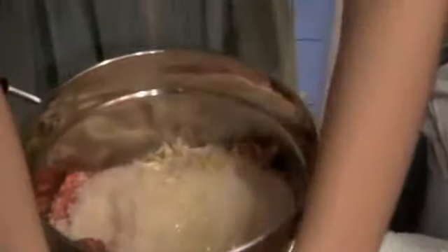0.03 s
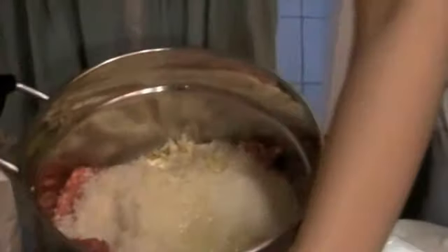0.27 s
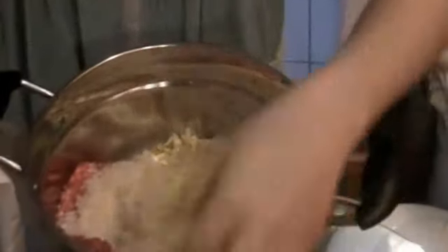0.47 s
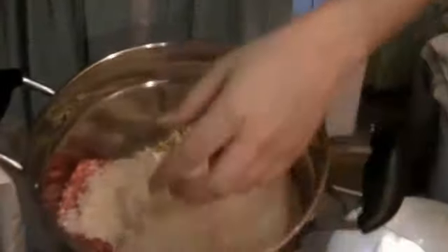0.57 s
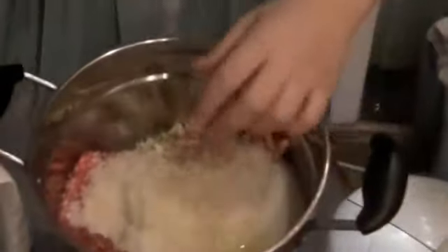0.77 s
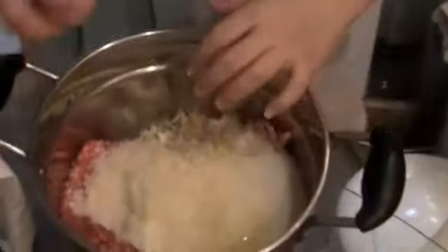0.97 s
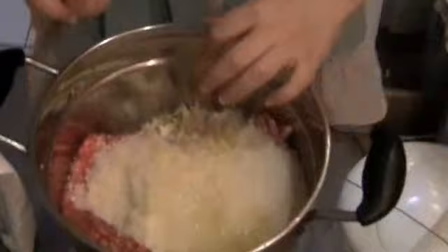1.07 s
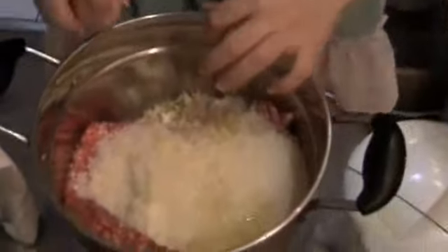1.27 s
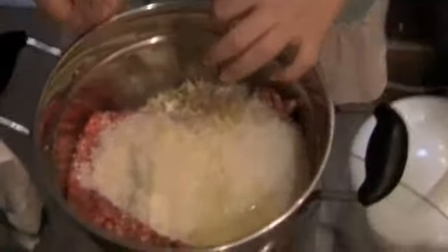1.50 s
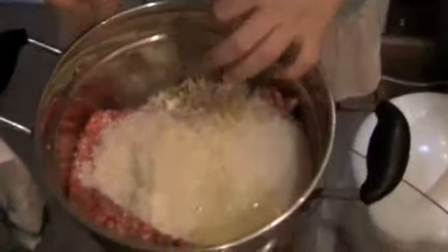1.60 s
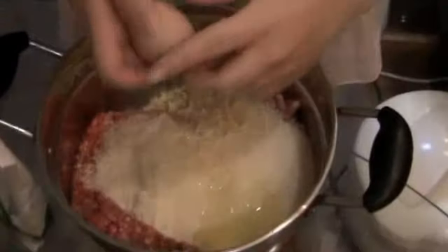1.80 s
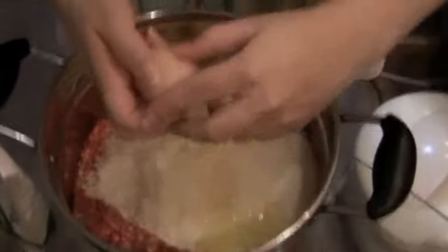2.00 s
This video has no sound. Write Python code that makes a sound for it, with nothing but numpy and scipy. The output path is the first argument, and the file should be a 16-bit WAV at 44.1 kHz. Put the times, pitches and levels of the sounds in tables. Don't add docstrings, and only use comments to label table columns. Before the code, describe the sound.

Egg cracking on a metal pot: light ticks of fingers on shell, the pot's base clatters and scrapes, small bumps follow, then two sharp knocks splinter the shell. Close-up in a live, quietly humming kitchen.

```python
import sys
import numpy as np
from scipy import signal
from scipy.io import wavfile

SR = 44100
rng = np.random.default_rng(int(sys.argv[2]) if len(sys.argv) > 2 else 0)


def master(y):
    cut = np.clip(np.atleast_2d(y).T, -1, 1)
    pcm = np.round(cut * 32767)
    wavfile.write(sys.argv[1], SR, pcm.astype(np.int16))


def invert_db(level):
    return 10 ** (np.asarray(level, dtype=float) / 20)


N = 90404

# frequency in Hz, level in dB per Hz.
AIR_SPECTRUM = [(25, -20), (60, -11.5), (115, -7.5), (200, -7), (450, -10.5), (1500, -15.5), (3000, -26.5),
                (13000, -38.5)]
# frequency in Hz, likeness from 0 to 1.
AIR_LIKENESS = [(60, 0.85), (240, 0.64), (950, 0.1), (3770, 0.22), (15000, 0.24)]
# frequency in Hz, level in dB rms.
MOTOR_HUM = [(50, -65.5), (180, -57)]
# start in seconds, peak in dB, pitch in Hz.
FINGER_TICKS = [(0.041, -53, 8000), (.070, -41, 9060), (0.087, -50, 8000), (0.1127, -29.5, 8000),
                (.129, -39, 7500), (.173, -36, 5500), (.187, -52, 7500), (0.222, -44, 9000),
                (0.292, -29, 10000), (0.354, -17.5, 4500), (.388, -25, 9000), (.576, -41, 8500),
                (.585, -29.5, 8500), (.596, -47, 10000), (.657, -36, 4900), (0.6712, -23, 2500),
                (0.6713, -35, 7500), (.684, -52, 4920), (.764, -29, 1157), (0.805, -39.5, 3500),
                (0.8057, -37.5, 8500), (0.875, -66, 1980), (1.027, -55, 1770), (1.96, -58, 2920)]
# start in seconds, end in seconds, level in dB.
SHELL_RUSTLES = [
    (0.071, 0.123, -68),
    (.11, 0.163, -59.5),
    (0.16, 0.25, -71),
    (0.577, 0.604, -64),
    (0.66, 0.691, -54.5),
]
# start in seconds, peak in dB, centre of the thud in Hz.
SOFT_BUMPS = [
    (0.172, -30, 1094),
    (0.646, -33, 390),
    (0.695, -36, 496),
    (0.805, -40.5, 1040),
    (1.198, -38.5, 800.0),
    (1.061, -55, 910),
]
# frequency in Hz, time to fall 60 dB in seconds.
KITCHEN_DECAY = [(150, 0.63), (500, 0.41), (1500, .42), (4000, 0.43), (9000, .33), (14000, 0.15)]
# frequency in Hz, side over mid in dB.
KITCHEN_WIDTH = [(200, -16), (2000, -14), (6000, -12.5), (13000, -0.5)]
# frequency in Hz, level in dB.
KITCHEN_TONE = [(100, 0.5), (400, 2.5), (1500, 2.5), (4000, 1.5), (8000, -0.5), (11500, 6), (14500, -21)]
# frequency in Hz, level in dB, time to fall 60 dB in seconds.
POT_MODES = [(262.6, -33.5, 0.8), (313, -26.5, 0.36), (388, -30, .2), (942, -21.5, 0.24), (1020, -36, 0.16),
             (1060, -30.5, 0.33), (1222, -20, 0.17), (1348, -27.5, 0.23), (1464, -23, 0.093),
             (1532, -30.5, .2), (1640, -32, 0.2), (2246, -26, 0.22), (3955, -32, 0.22), (6190, -30.5, 0.11)]
# frequency in Hz, level in dB, time to fall 60 dB in seconds.
HELD_POT_MODES = [(311.5, -1, .6), (452, -4.5, 0.41)]
# frequency in Hz, level in dB, time to fall 60 dB in seconds.
COUNTER_MODES = [(153, -29.5, 0.11), (268.3, -36.5, 0.56), (574.6, -23, 0.089), (974, -23.5, .12)]
# start in seconds, peak in dB.
BOUNCES = [(0.232, -3.5), (0.235, -1.5), (0.25, 0), (0.254, -1.5), (0.266, -5), (0.288, -13.5),
           (0.313, -25), (0.332, -19), (0.353, -9.5), (0.372, -35.5), (0.386, -22.5)]
# frequency in Hz, level in dB, time to fall 60 dB in seconds.
BASE_MODES = [(398, -13.5, 0.019), (743, -8, 0.0067), (1037, -8.5, 0.013), (1553, -1, 0.0051),
              (1890, -2, 0.006), (2500, -4.5, 0.0045), (3265, -8.5, 0.0056), (4060, -13.5, 0.0054),
              (5290, -19.5, 0.0079), (7500, -17.5, 0.0018), (10300, -26.5, .002)]
# start in seconds, blow in dB, shell crack in dB, crack delay in seconds, wall ring in dB.
EGG_KNOCKS = [
    (1.3678, 4, 7, 0.00029, -18.5),
    (1.5639, -7, 1, .0018, -29.5),
]
# frequency in Hz, level in dB, time to fall 60 dB in seconds.
RIM_MODES = [(173, -19, 0.015), (414, -28.5, 0.048), (561, -13, 0.035), (800, -14.5, 0.0079),
             (1040, -10.5, 0.032), (1340, 3.5, 0.0031), (2200, -9, 0.011), (2700, -15.5, 0.023)]
# frequency in Hz, level in dB, time to fall 60 dB in seconds.
SHELL_MODES = [(3500, -16, 0.0085), (4870, -12, 0.0011), (5400, -20.5, .025), (5985, -6.5, 0.0045),
               (7500, -11, 0.0079), (8500, -5, 0.0018), (9440, -15.5, 0.011), (11370, -12.5, 0.0018),
               (14600, -26, 0.00196)]

AIR_DB = -50
SPREAD_DB, EGG_SPREAD_DB = 3.5, 1.8
TICK_CYCLES, TICK_DB, TICK_OCTAVES = 6.8, 2, 1
RUSTLE_PER_S = 2600
KITCHEN_DB, FIRST_ECHO_S = -34.0, 0.0015
RING_SEND_DB, HAND_SEND_DB = -6, -5.0
BOUNCE_DB, BUMP_RING_DB = 5.0, 18.5
SLIDE_START_S, SLIDE_END_S, SLIDE_PER_S, SLIDE_DB = 0.235, 0.36, 900.0, -24.5
BASE_BAND_HZ = [310, 9500]
LANDING_DB, LANDING_HZ = -28.5, 87.5
BURST_SAMPLES = 2048
MAKEUP_DB, PAN_DB, HAND_PAN_DB, AIR_PAN_DB = 1.5, 0.53, -1, -0.4
LOW_CUT_HZ, TOP_CUT_HZ = 29.5, 11700
DUCK_FROM_DB, DUCK_SHARE, DUCK_ATTACK_S, RECOVER_DB_PER_S = -2.5, 0.96, 0.00042, 56.5
CEILING = 1.37


def at_hz(points, hz):
    table_hz, value = np.transpose(points)
    return np.interp(np.log(hz), np.log(table_hz), value)


def band_pass(x, band_hz, order=2):
    return signal.sosfilt(signal.butter(order, band_hz, "band", fs=SR, output="sos"), x)


def ring(clicks, hz, t60):
    radius = invert_db(-60 / (t60 * SR))
    angle = 2 * np.pi * hz / SR
    return signal.lfilter([0, np.sin(angle)], [1, -2 * radius * np.cos(angle), radius**2], clicks + 1e-18)


def strike(modes, s, db, spread_db=SPREAD_DB):
    out = np.zeros(N)
    own = rng.standard_normal((len(s), len(modes)))
    at = (np.asarray(s) * SR).astype(int)
    first = at.min()
    for k, (hz, level_db, t60) in enumerate(modes):
        end = min(N, at.max() + int(1.5 * t60 * SR))
        clicks = np.zeros(end - first)
        sign = (-1) ** k
        np.add.at(clicks, at - first, sign * invert_db(np.asarray(db) + level_db + spread_db * own[:, k]))
        out[first:end] += ring(clicks, hz, t60)
    return out


def grains(start, end, per_s, uneven_db):
    t = np.arange(N) / SR
    chance, size, side = rng.random(size=(3, N))
    height = invert_db(-uneven_db * np.log(size + 0.00033))
    return height * np.sign(side - 0.5) * (chance < per_s / SR) * (t > start) * (t < end)


def snap(s, db, hz, octaves, t60):
    out = np.zeros(N)
    t = np.arange(BURST_SAMPLES) / SR
    edges = np.clip(hz * 2.0 ** np.array([-octaves, octaves]), 30, 0.45 * SR)
    burst = band_pass(rng.standard_normal(BURST_SAMPLES) * invert_db(-60 * t / t60), edges, order=3)
    at = int(s * SR)
    out[at:at + BURST_SAMPLES] = invert_db(db) * burst / np.abs(burst).max()
    return out


def bands(shape):
    edges = 28 * 2 ** np.arange(0, 9.6, 0.5)
    white = rng.standard_normal((2, 2, N))
    total = 0
    for k, (low, high) in enumerate(zip(edges, edges[1:])):
        mid, side = band_pass(white[k % 2], [low, high])
        total = total + shape(np.sqrt(low * high), mid, side)
    return total


def air():
    def shape(hz, mid, side):
        alike = np.clip(at_hz(AIR_LIKENESS, hz), 0, 1)
        stereo = np.sqrt(1 + alike) * mid + np.sqrt(1 - alike) * side * [[1], [-1]]
        return invert_db(at_hz(AIR_SPECTRUM, hz)) * stereo

    hush = bands(shape)
    out = invert_db(AIR_DB) * hush / hush.std()
    for hz, db in MOTOR_HUM:
        hum = ring(rng.standard_normal(N), hz, 0.67)
        out = out + invert_db(db) * hum / hum.std()
    return out


def handling():
    ticks = sum(snap(s, db + TICK_DB, hz, TICK_OCTAVES, 0.0044 + TICK_CYCLES / hz)
                for s, db, hz in FINGER_TICKS)
    rubbing = sum(invert_db(db) * grains(start, end, RUSTLE_PER_S, uneven_db=3.5)
                  for start, end, db in SHELL_RUSTLES)
    rustle = invert_db(19.5) * band_pass(rubbing, [1500.0, 10500.0])
    bumps = sum(snap(s, db, hz, 0.68, 0.096) for s, db, hz in SOFT_BUMPS)
    return ticks + rustle + bumps


def kitchen(x):
    t = np.arange(N) / SR

    def shape(hz, mid, side):
        stereo = mid + invert_db(at_hz(KITCHEN_WIDTH, hz)) * side * [[1], [-1]]
        return stereo * invert_db(at_hz(KITCHEN_TONE, hz) - 60 * t / at_hz(KITCHEN_DECAY, hz))

    echoes = (bands(shape) * (t > FIRST_ECHO_S))[:, :SR]
    return invert_db(KITCHEN_DB) * signal.fftconvolve(x[None], echoes, axes=1)[:, :N]


def walls():
    bump_s, bump_db, _ = np.transpose(SOFT_BUMPS)
    bounce_s, bounce_db = np.transpose(BOUNCES)
    knock_s, *_, wall_db = np.transpose(EGG_KNOCKS)
    bumped = strike(POT_MODES[1:3], bump_s, bump_db + BUMP_RING_DB)
    bounced = strike(POT_MODES, bounce_s, bounce_db + BOUNCE_DB)
    knocked = strike(HELD_POT_MODES, knock_s, wall_db, EGG_SPREAD_DB)
    thud = strike(COUNTER_MODES, knock_s[1:], [6.0], EGG_SPREAD_DB)
    return bumped + bounced + knocked + thud


def clatter():
    s, db = np.transpose(BOUNCES)
    base = strike(BASE_MODES, s, db + BOUNCE_DB)
    slide = invert_db(SLIDE_DB) * grains(SLIDE_START_S, SLIDE_END_S, SLIDE_PER_S, uneven_db=4.5)
    scrape = sum(invert_db(level_db) * ring(slide, hz, t60) for hz, level_db, t60 in BASE_MODES)
    landing = snap(s[0], LANDING_DB, LANDING_HZ, 1.29, 0.041)
    return band_pass(base + scrape, BASE_BAND_HZ) + landing


def knocks():
    s, blow_db, crack_db, delay_s, _ = np.transpose(EGG_KNOCKS)
    crack_s = s + delay_s
    rim = strike(RIM_MODES, s, blow_db, EGG_SPREAD_DB)
    shell = strike(SHELL_MODES, crack_s, crack_db, EGG_SPREAD_DB)
    splinters = sum(snap(at, db - 8.0, 1990.0, 2.28, 0.035) for at, db in zip(crack_s, crack_db))
    return rim + shell + splinters


def pan(x, db):
    return x * invert_db(np.array([[db], [-db]]))


def scene():
    hands, rings = handling(), walls()
    blows = invert_db(MAKEUP_DB) * (clatter() + knocks())
    echoes = kitchen(blows + invert_db(RING_SEND_DB) * rings + invert_db(HAND_SEND_DB) * hands)
    direct = pan(blows, PAN_DB) + pan(rings + hands, HAND_PAN_DB)
    return direct + echoes + pan(air(), AIR_PAN_DB)


def band_limit(x):
    return signal.sosfilt(signal.butter(12, 16640, fs=SR, output="sos"), x)


def record(dry):
    t = np.arange(N) / SR
    heard = band_pass(dry, [LOW_CUT_HZ, TOP_CUT_HZ])
    level_db = 20 * np.log10(np.abs(heard).max(axis=0) + 1e-9)
    over_db = np.maximum(level_db - DUCK_FROM_DB, 0)
    recovery_db = RECOVER_DB_PER_S * t
    held_db = np.maximum.accumulate(over_db * DUCK_SHARE + recovery_db) - recovery_db
    lag = np.exp(-1 / (DUCK_ATTACK_S * SR))
    ducked = heard * invert_db(-signal.lfilter([1 - lag], [1, -lag], held_db))
    return band_limit(CEILING * np.tanh(ducked / CEILING))


dry = scene()
out = record(dry)
master(out)
```